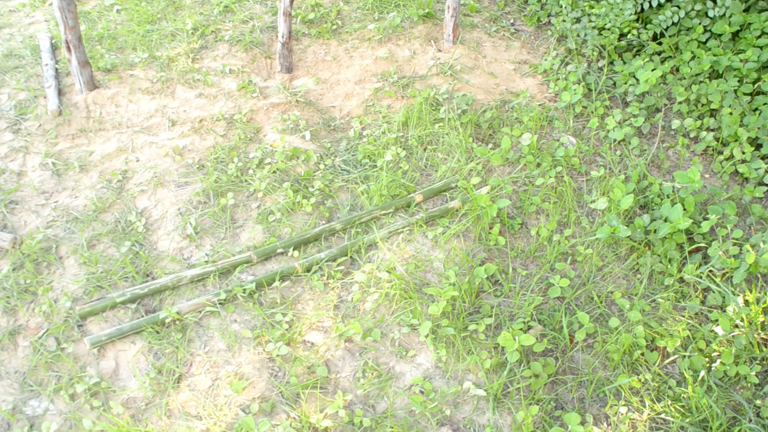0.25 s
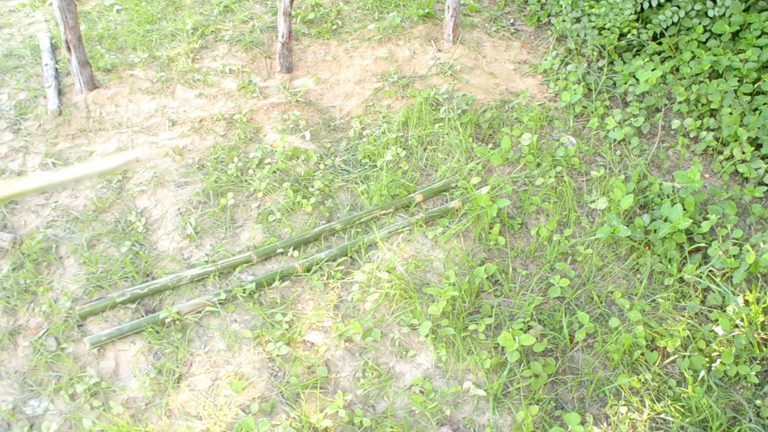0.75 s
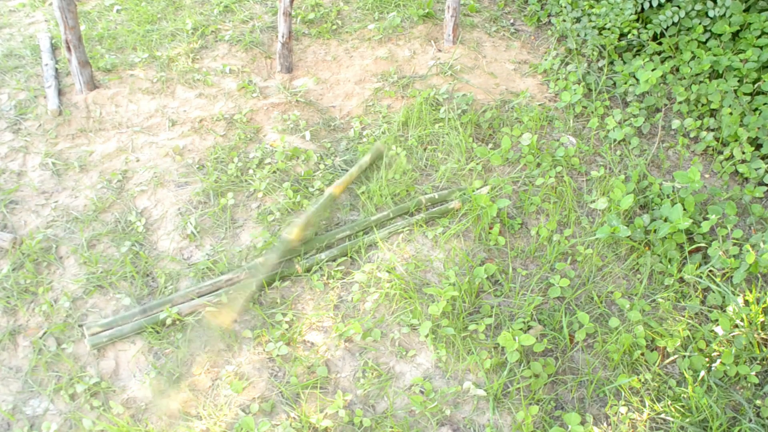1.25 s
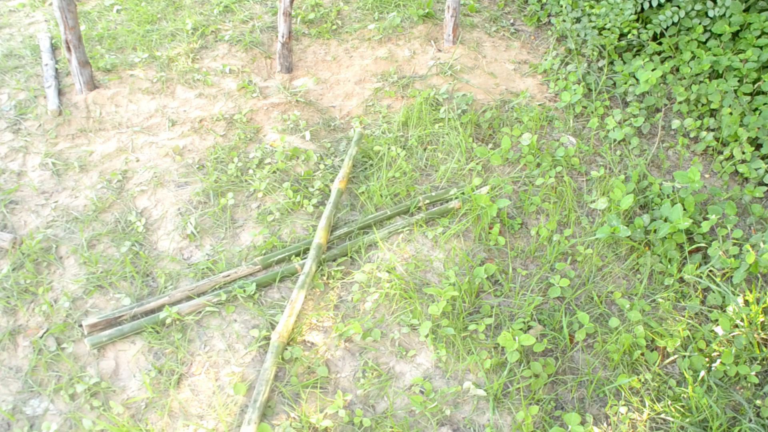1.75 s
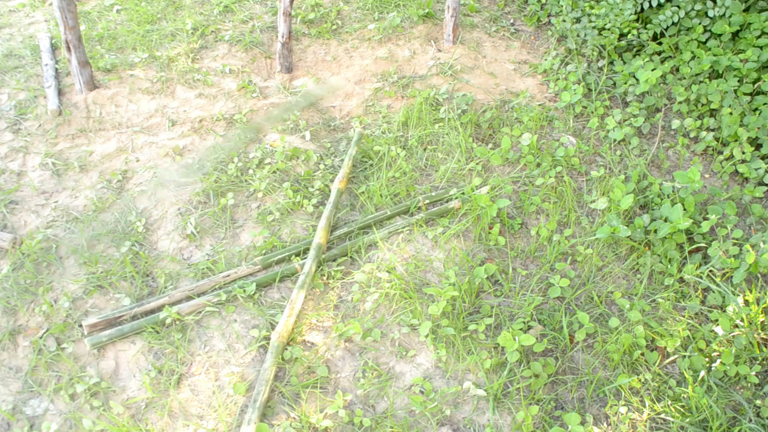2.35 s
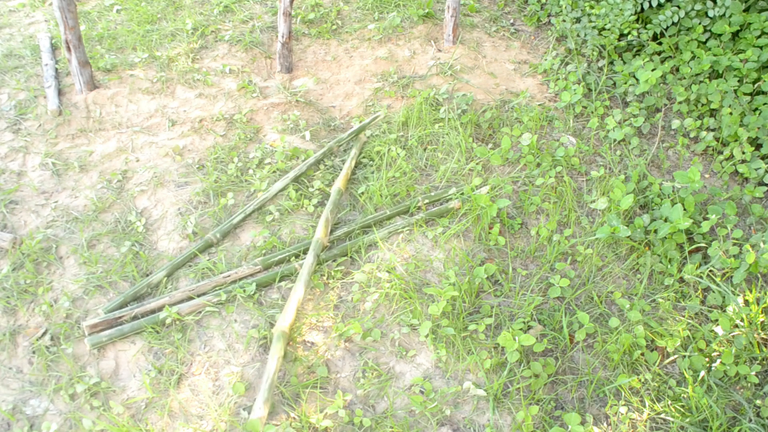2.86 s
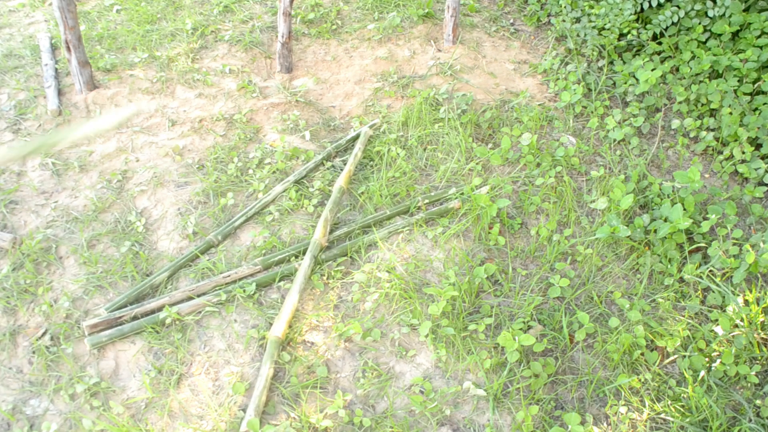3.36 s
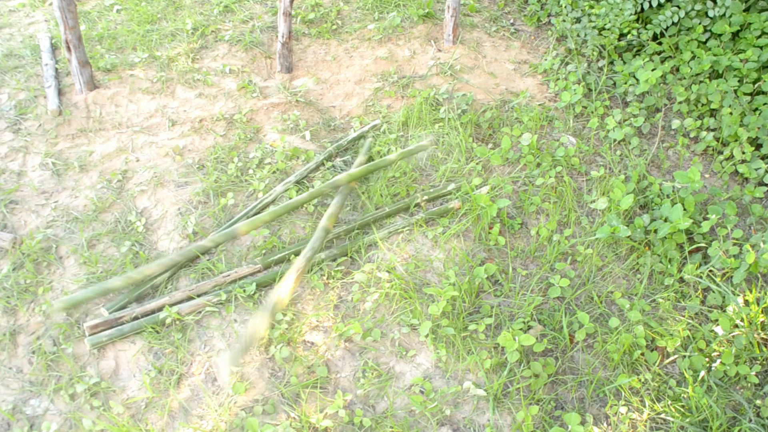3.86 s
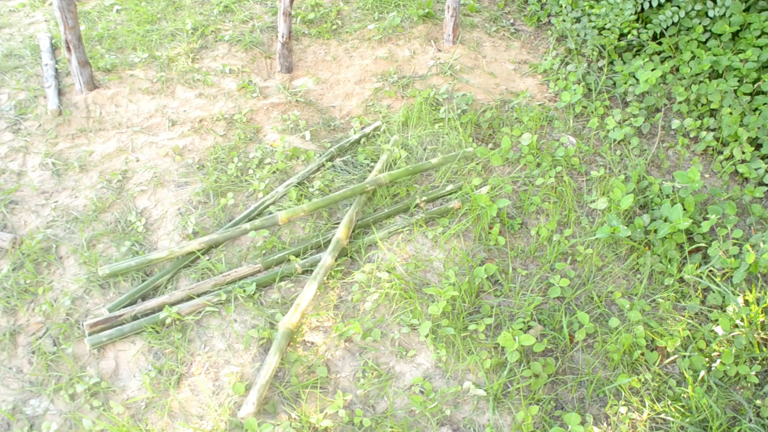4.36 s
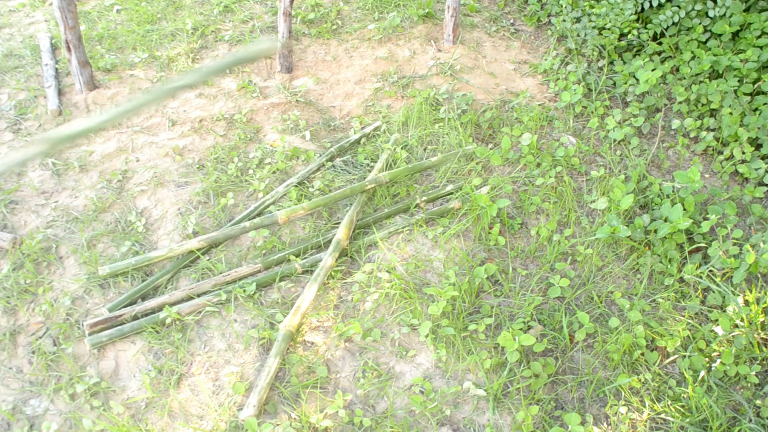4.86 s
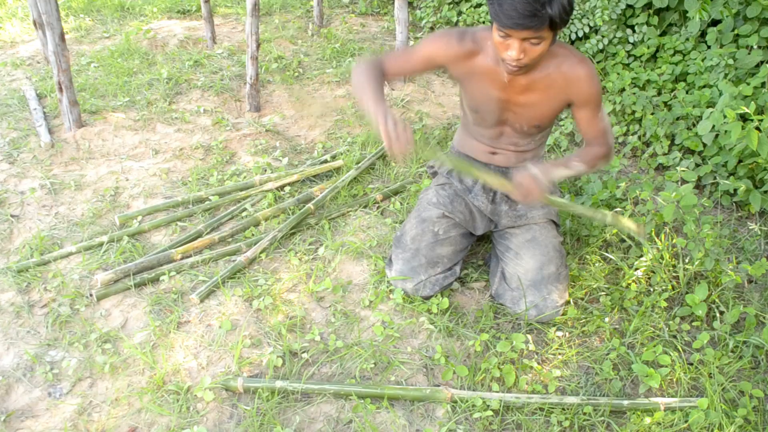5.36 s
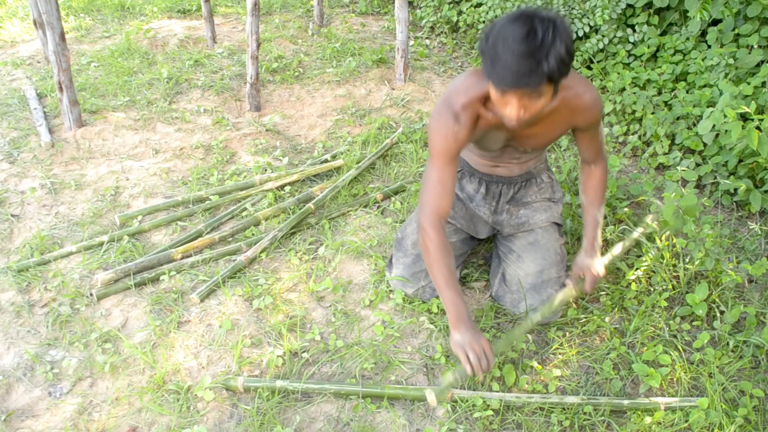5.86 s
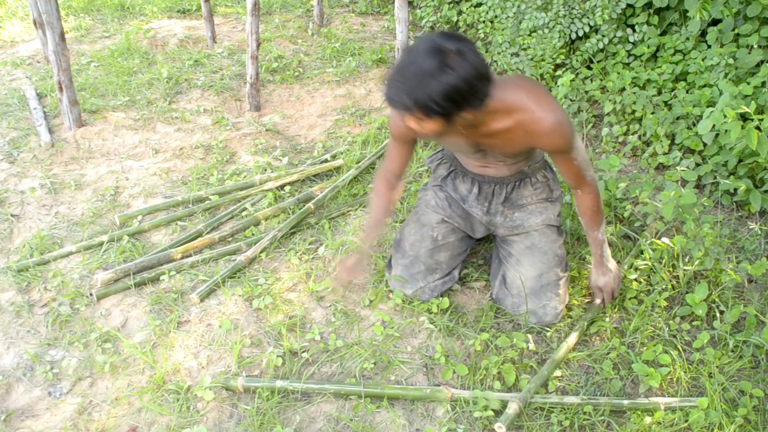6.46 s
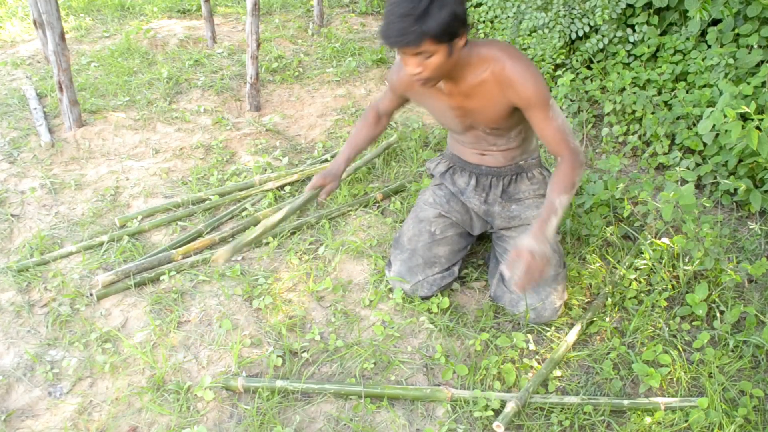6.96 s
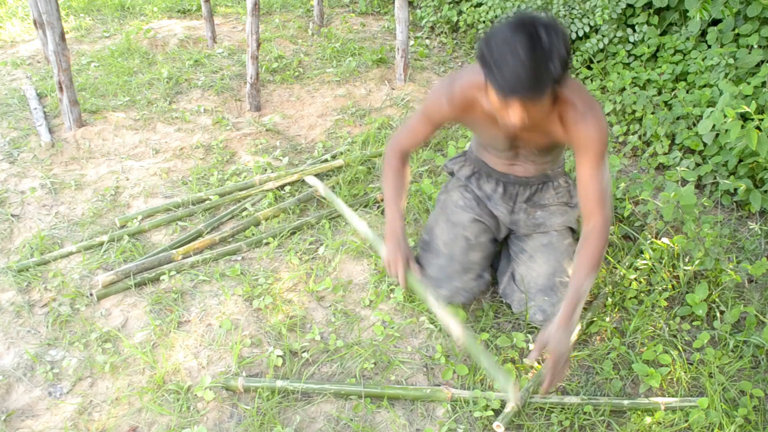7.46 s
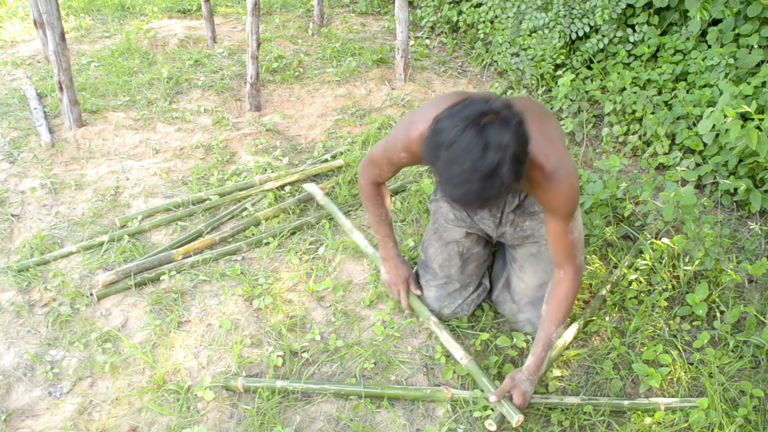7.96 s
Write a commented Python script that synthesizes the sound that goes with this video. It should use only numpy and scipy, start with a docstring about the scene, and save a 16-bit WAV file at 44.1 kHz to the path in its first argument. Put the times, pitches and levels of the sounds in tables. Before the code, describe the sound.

A dry, close outdoor scene with very quiet air. At 0 s there is a faint leftover tap and light grass rustle. At 1.0 s a first bamboo pole lands with hollow clacks and a soil thud, bouncing again at 1.25 s. A second, harder crack comes at 2.47 s, with a run of knocks until about 2.85 s. The third hits sharply at 3.79 s and rattles down, weakening until 4.3 s; tiny stalk snaps follow near 4.4 s. The fourth lands at 5.09 s, brightest and loudest at 5.13 s, slightly overloaded, and its clatter stops abruptly at 5.3 s. Then it is much quieter: faint grass scuffs, dry snaps near 5.8 s, a short damped knock at 6.03 s as a pole is laid by hand, and a cluster of soft taps at 7.6 s, with smaller ones to 8.1 s. Very faint distant chirps appear now and then.

```python
"""A grassy spot in the open: four green bamboo poles are tossed, one after another, onto a small pile.
Tube modes ring under noise bursts for wall, skin and soil; the hardest cracks overload the microphone.
Then two poles are laid down by hand across a third. Grass rustles as gated friction noise, dry stalks
snap as short clicks, faint chirps are noise-smeared tones, and filtered noise makes the open air."""
import sys
import numpy as np
from scipy import signal
from scipy.fft import rfft, irfft, next_fast_len
from scipy.io import wavfile
from scipy.ndimage import uniform_filter1d

SR = 44100
rng = np.random.default_rng(int(sys.argv[2]) if len(sys.argv) > 2 else 0)


def digitize_waveform(pressure):
    """Quantize a signal to 16-bit integers and store it at the path in sys.argv[1].

    Rows of a 2-D input are taken as channels; values are limited to [-1, 1].
    """
    field = np.atleast_2d(pressure).T
    bounded = np.clip(field, -1, 1)
    quanta = np.round(bounded * 32767).astype(np.int16)
    wavfile.write(sys.argv[1], SR, quanta)


N = 361619  # length in samples
RING_TIME = np.arange(SR // 2) / SR  # time axis of every knock and click [s]

# still outdoor air: (frequency [Hz], relative density [dB per Hz])
AIR_SPECTRUM = [(15, -39), (25, -17.5), (87, -1), (229, -2), (263, -1), (363, 0), (416, -2.5), (476, -1),
                (1040, -4.5), (2220, -10.5), (4140, -15.5), (4610, -18.5), (5280, -18.5), (9840, -34.5),
                (16000, -73.5)]
AIR_DB = -59

# hiss of the grass blades: (frequency [Hz], relative density [dB per Hz])
BLADE_SPECTRUM = [(1000, -23.5), (3000, -0.5), (5000, 1.5), (9500, 0.5), (11500, -17.5), (16000, -12.5)]
# scuff of the dry litter: (frequency [Hz], relative density [dB per Hz])
LITTER_SPECTRUM = [(200, -24), (700, -4.5), (1500, 4), (3000, 0), (5000, -7), (9000, -26.5)]
# stretches of grassy hiss and scuff that switch on and off:
# (time [s], length [s], hiss level [dB], scuff over hiss [dB])
GRASS_STRETCHES = [(0, 0.53, -67.5, 3.5), (0.229, 0.16, -57.5, -8), (0.735, 0.04, -56, -16),
                   (1.302, 0.34, -69.5, 12), (1.74, 0.14, -59, -19), (1.97, 0.44, -71, -4),
                   (2.423, 0.02, -45.5, 1), (2.555, 0.426, -64.5, 3.5), (3.1, 0.54, -67, -0.5),
                   (4.46, 0.089, -62.5, -0.5), (4.74, 0.035, -59.5, 1), (5.336, 0.17, -57, -18),
                   (5.505, .13, -62, -8), (5.7, .62, -69.5, 6), (6.671, 0.13, -64, 0),
                   (6.801, 0.18, -74.5, 13.5), (7.35, 0.072, -77.5, 15), (7.919, 0.044, -67.5, 19.5),
                   (7.977, 0.21, -64.5, 8)]
# each tossed pole first meets the grass: (time [s], extra stir of blades and litter [dB])
GRASS_LANDINGS = [(1.02, -1.5), (2.417, -1.5), (3.76, 4), (5.086, 1.5)]
FLIGHT_S = 0.233  # the grass is still while a pole is in the air
# steady stir of the grass under the worker
STIR_HISS_DB, STIR_SCUFF_DB = -73, -66
# stirred blades spring back slowly, the litter settles fast: base level, seconds to fall 60 dB
BLADES_DB, BLADES_T60 = -55.5, 2.8
LITTER_DB, LITTER_T60 = -43, 1.2

# pole knocks, the last three columns relative to the strength: (time [s], strength [dB],
# ring centre [Hz], ring of the poles it lands on [dB], clack of the wall [dB], crack of the skin [dB])
POLE_CONTACTS = [(.001, -29, 1450, -10.5, -3, -14), (.019, -38, 1250, -28, -2, -26),
                 (1.02, -18.5, 2400, -2.5, 3.5, -9), (1.024, -18, 715, -13, 0, 0),
                 (1.0358, -12, 2250, -7, -8, 4.5), (1.228, -45.5, 1500, 0, 9.5, 2),
                 (1.237, -37, 1480, 6, -10, -5), (1.2528, -11.5, 2300, -16, -12, -16.5),
                 (1.263, -17, 1450, -34.5, -6.5, -12), (1.35, -41, 1950, -9, -2, -4.5),
                 (1.54, -42.5, 810, -2, 11.5, -17), (2.443, -23, 1700, 1, -2, -2.5),
                 (2.47, -4, 1600, -1.5, -0.5, 0), (2.5309, -12.5, 930, -3, -8.5, -6),
                 (2.643, -28.5, 1500, 13, -1, -8), (2.675, -11.5, 1250, -9.5, -5.5, -7.5),
                 (2.6816, -16.5, 1690, -6, 4, -6.5), (2.755, -22, 2150, 4, -10, -8),
                 (2.7625, -10, 1750, -19, -8.5, -8.5), (2.798, -36, 2250, -6, 3, -20),
                 (2.8409, -14.5, 1340, -17.5, -6.5, -38), (3.002, -45, 1110, 0, -35.5, -0.5),
                 (3.7605, -44.5, 1000, 0, -4, 19), (3.765, -44.5, 2250, 4, 1, 16),
                 (3.7851, -3.5, 1940, -2, -1.5, 0), (3.828, -11, 730, -3, -8.5, -17),
                 (3.8865, -24.5, 1680, 7.5, 7, 5.5), (3.894, -16.5, 1270, -3.5, -24, 1),
                 (3.919, -30, 2600, -8, 9, -11.5), (3.929, -8.5, 740, -12, -9.5, -18),
                 (3.962, -26.5, 1980, 5.5, -1, -16), (4.0565, -13, 1222, -9.5, -0.5, -4),
                 (4.115, -25, 1940, -9, -5, -7.5), (4.1523, -26, 1400, -6.5, 1.5, -14),
                 (4.2, -37, 1680, 1.5, 0.5, -8), (4.252, -34.5, 1680, -1.5, 0.5, -5),
                 (4.291, -34.5, 1250, -5.5, -1.5, -24), (5.087, -33, 690, 17.5, -6, 5),
                 (5.0907, -3.5, 2660, -30.5, -7.5, 1), (5.1245, -13.5, 1450, 2.5, 7, 4),
                 (5.1283, 0, 2630, -33, -6, -6.5), (5.206, -29.5, 1070, 5.5, 9, -3),
                 (5.223, -23.5, 1450, -2, 1.5, -5), (5.2293, -12.5, 2600, -30, -8.5, -9),
                 (5.24, -26, 1230, 8, 6, 1), (5.281, -18, 1730, -1.5, -6, -10),
                 (5.29, -19, 1655, -12, 0.5, -8.5), (5.299, -26, 1440, 5.5, 1, -12),
                 (6.03, -14, 710, -42.5, -13, -22), (6.033, -9, 1615, -10, -22, -31),
                 (6.077, -27.5, 2300, -23, -9.5, -29), (6.834, -42, 814, -9, -15, -26.5),
                 (7.5742, -15, 1940, -35, -5, -12.5), (7.587, -30, 2600, -7.5, 7, 2.5),
                 (7.594, -15, 2220, -0.5, -19, -17), (7.601, -17, 930, -26, -7.5, -18),
                 (7.618, -22, 1000, -19, -8.5, -30), (7.8581, -23, 1850, -21, -2, -19.5),
                 (7.872, -30.5, 1230, -6, -9, -29), (7.9756, -30.5, 1600, -11, -1.5, -22.5),
                 (8.083, -25.5, 1080, -23, -7, -13)]
# poles that are landed on, ring times before damping: (frequency [Hz], level [dB], t60 [s])
LANDED_ON_MODES = [(268.5, -19, 1), (512, -18, .3), (515, -14.5, 0.4), (762, -4, .24), (812, -6, 0.29),
                   (1073, -4.5, .21), (1348, -10, .18), (1436, -2, 0.088)]
# first tossed pole, which also sounds the opening knocks: (frequency [Hz], level [dB], t60 [s])
FIRST_TOSSED_MODES = [(536.4, -0.5, 0.16), (726, -8, 0.16), (1041, -4, 0.11), (1210, -28, .08),
                      (1357, 5.5, 0.034), (1660, -19, 0.056), (1715, -3.5, 0.088), (1780, -20, 0.12),
                      (1936, -1, 0.056), (2402, -4.5, 0.072), (2700, -25.5, 0.032), (2870, -24, 0.081)]
# second tossed pole: (frequency [Hz], level [dB], t60 [s])
SECOND_TOSSED_MODES = [(1069, 0, 0.079), (1234, -22.5, 0.18), (1433, -4, 0.19), (1720, -2.5, 0.091),
                       (1874, -0.5, 0.017), (2005, -4.5, 0.085), (2287, -9.5, 0.09), (2770, -26.5, 0.084),
                       (3670, -13.5, 0.033), (4450, -1, 0.097), (5297, -23, 0.08)]
# third tossed pole: (frequency [Hz], level [dB], t60 [s])
THIRD_TOSSED_MODES = [(1023, -7.5, .14), (1379.6, -0.5, 0.075), (1500, -15.5, 0.13), (1631, -10, .08),
                      (1630, -9.5, 0.088), (1877, -8, .1), (2014, -1.5, 0.063), (2278, -8, 0.044),
                      (2910, -6, 0.05), (3081, -5.5, .05), (4430, -11, 0.049), (4960, -9, .05)]
# fourth tossed pole: (frequency [Hz], level [dB], t60 [s])
FOURTH_TOSSED_MODES = [(806, 1.5, 0.27), (991, 2, 0.082), (1220, -11, 0.15), (1323, 1, 0.1),
                       (1352, -14, 0.031), (1697, -11, 0.17), (1830, -11.5, 0.06), (2175, -9.5, 0.088),
                       (2283, -10.5, 0.076), (2970, -26, 0.1), (3300, -37, 0.054)]
# first pole laid by hand: (frequency [Hz], level [dB], t60 [s])
FIRST_LAID_MODES = [(754, -1, .115), (820, -16, .12), (1030, -13, .05), (1305, -6, .06), (1368, -4, .095),
                    (1659, -6, .09), (2022, -13, .075), (2235, -21, .06), (2680, -23, .07), (2960, -25, .1)]
# second pole laid by hand: (frequency [Hz], level [dB], t60 [s])
SECOND_LAID_MODES = [(431, -9, 0.16), (733, -7.5, 0.13), (806, -16.5, 0.2), (1020, -15.5, 0.1),
                     (1275, -0.5, 0.041), (1360, -10.5, 0.11), (1621, -7.5, 0.078), (2104, -3.5, 0.051),
                     (3200, -27, 0.053), (3585, -7.5, 0.05)]
# the next pole takes over: (time [s])
POLE_CHANGES = [2.3, 3.6, 5.0, 5.9, 6.5]
BREAK_OFF_S = 5.308  # the clatter and the settling of the grass break off abruptly
# share of ring time kept by the poles landed on; further share when a pole is laid by hand
LANDED_ON_SUSTAIN, HELD_SUSTAIN = .85, .35
CUSHION_S = 0.00072  # grass cushions each knock: time constant of the ring's build-up
# a springy pole touches again at once, more weakly; the delay varies around this one
RETOUCH_S, RETOUCH_DB = .004, -11
# clack of the tube wall: (frequency [Hz], relative density [dB per Hz])
CLACK_SPECTRUM = [(200, -39), (600, -8), (1100, 6), (1500, 4.5), (2200, -0.5), (3000, -6), (5000, -23),
                  (10000, -50.5), (16000, -69)]
# crack of the hard skin: (frequency [Hz], relative density [dB per Hz])
CRACK_SPECTRUM = [(100, -42), (500, -16), (2000, 7.5), (3200, 3.5), (5300, 1.5), (7000, -7), (8000, -14.5),
                  (10500, -14.5), (13000, -46.5), (16000, -17.5)]

# dry stalks snapping: (time [s], level [dB], centre [Hz])
STALK_SNAPS = [(.485, -46, 2530), (2.12, -42.5, 2500), (3.327, -50.5, 7860), (4.217, -41, 6200),
               (4.41, -40.5, 5530), (4.415, -39.5, 2000), (5.771, -36.5, 3460), (5.829, -42, 4043),
               (6.927, -46, 5500)]

# an end of a pole digs into the soil: (time [s], level [dB])
SOIL_THUDS = [(1.024, -13.5), (1.041, -17.5), (1.254, -25), (2.47, -25), (2.5315, -22.5), (3.002, -38.5),
              (3.236, -45), (3.785, -10), (3.894, -29), (4.0566, -19.5), (4.115, -32), (4.1525, -28),
              (4.2, -32), (4.251, -35), (4.291, -37), (5.1287, -15), (5.206, -27), (5.24, -31),
              (7.594, -25), (7.618, -33), (7.754, -40), (8.086, -36)]
# dull push of the soil: (frequency [Hz], relative density [dB per Hz])
THUD_SPECTRUM = [(30, -39.5), (150, -8.5), (280, 3), (550, 3.5), (800, 5), (1500, -26.5), (5000, -56.5)]

# faint chirps from far trees: (time [s], length [s], frequency [Hz], level [dB])
FAR_CHIRPS = [(3.527, 0.16, 3640, -69.5), (3.642, 0.075, 2620, -65.5), (4.932, 0.08, 2500, -64),
              (5.343, 0.14, 4630, -63.5), (5.837, 0.1, 4670, -70), (6.37, 0.18, 4620, -74),
              (6.956, 0.047, 4700, -67), (7.422, .14, 4620, -75)]

EDGE_HZ = 16300  # upper band limit


def amp(db):
    """Decibels to gain."""
    return 10 ** (np.asarray(db) / 20)


def unit(x):
    """Scales to rms 1."""
    return x / np.sqrt(np.mean(x ** 2) + 1e-20)


def add(mix, s, sound):
    """Mixes a sound in at s seconds."""
    part = mix[max(round(s * SR), 0):][:len(sound)]
    part += sound[:len(part)]


def colour(x, spectrum):
    """Causal filter through (Hz, dB) points on a log-frequency axis; white noise keeps its power."""
    hz, db = np.transpose(spectrum)
    size = next_fast_len(len(x))
    bins = abs(np.fft.fftfreq(size, 1 / SR))
    gain = unit(amp(np.interp(np.log(bins + 1), np.log(hz), db)))
    response = np.exp(np.conj(signal.hilbert(np.log(gain))))  # minimum phase
    return irfft(rfft(x, size) * response[:size // 2 + 1], size)[:len(x)]


def air(swell_db=0.2):
    """Quiet open-air background: coloured noise whose level swells a little through slow sines."""
    t = np.arange(N) / SR
    sines = [np.sin(2 * np.pi * (hz * t + rng.random())) for hz in np.geomspace(1, 8, 10)]
    swell = unit(sum(sines))
    noise = unit(colour(rng.standard_normal(N), AIR_SPECTRUM))
    return amp(AIR_DB + swell_db * swell) * noise


def friction(spectrum, grains_per_s, spread_db, grain_share):
    """Stalks slide past each other: a soft hiss with tiny ticks in it."""
    hits = rng.random(N) < grains_per_s / SR
    ticks = hits * amp(spread_db * np.minimum(rng.exponential(1, N), 4))
    grains = unit(ticks * rng.choice([-1, 1], N))
    return unit(colour(rng.standard_normal(N) + grain_share * grains, spectrum))


def grass(blur_s=.025):
    """Hiss and scuff switch on and off; landings stir blades and litter; all is still while a pole flies."""
    t = np.arange(N) / SR
    power = amp([[STIR_HISS_DB], [STIR_SCUFF_DB]]) ** 2 * np.ones(N)  # rows: blades, litter
    for s, length, db, scuff_db in GRASS_STRETCHES:
        power[:, (t >= s) & (t < s + length)] += amp([[db], [db + scuff_db]]) ** 2
    for s, db in GRASS_LANDINGS:
        settling = (t >= s) & (t < BREAK_OFF_S)
        t60 = np.array([[BLADES_T60], [LITTER_T60]])
        fall = np.exp(-np.log(1000) * (t[settling] - s) / t60)
        power[:, settling] += (amp([[db + BLADES_DB], [db + LITTER_DB]]) * fall) ** 2
        power[:, (t > s - FLIGHT_S) & (t < s + blur_s / 2)] = 0
    # soften the edges of every stir
    hiss, scuff = uniform_filter1d(np.sqrt(power), max(round(blur_s * SR), 1), axis=1)
    blades = friction(BLADE_SPECTRUM, grains_per_s=750, spread_db=4.5, grain_share=0.28)
    litter = friction(LITTER_SPECTRUM, grains_per_s=740, spread_db=3.5, grain_share=0.33)
    return hiss * blades + scuff * litter


def fade(t60):
    """Exponential decay, 60 dB down after t60 seconds."""
    return np.exp(-np.log(1000) * RING_TIME / np.maximum(t60, 1e-3))


def burst(spectrum, t60, tail_db, tail_t60, strike_db=-12):
    """Modes too dense to tell apart: the first push, a quick decay, then a faint scatter from the bushes."""
    envelope = fade(t60) + amp(tail_db) * fade(tail_t60)
    push = rng.standard_normal(len(RING_TIME)) * envelope
    push[0] += amp(strike_db) * np.linalg.norm(push)
    return colour(push / np.hypot(1, amp(strike_db)), spectrum)


def ring(modes, centre_hz, focus_db, uneven_db, sustain=1, detune=0.015):
    """Tube modes; contact hardness favours one region, the spot struck sets each mode's sign and size."""
    hz, db, t60 = np.transpose(modes)[:, :, None]
    side, spot, support = rng.standard_normal((3, len(hz), 1))
    focus = focus_db * np.log2(hz / centre_hz) ** 2
    size = np.sign(side) * amp(db - focus + uneven_db * spot)
    hz = hz * (1 + detune * support)  # the poles rest differently at every bounce
    return (size * fade(t60 * sustain) * np.sin(2 * np.pi * hz * RING_TIME)).sum(0)


def touch(clack_db, crack_db):
    """The tube wall clacks and the hard skin cracks, each a burst of dense modes."""
    clack = burst(CLACK_SPECTRUM, t60=0.056, tail_db=-31.5, tail_t60=.24, strike_db=-7)
    crack = burst(CRACK_SPECTRUM, t60=0.014, tail_db=-22.0, tail_t60=.18, strike_db=-10)
    return amp(clack_db) * clack + amp(crack_db) * crack


def bamboo(free_sustain=1.0):
    """Each contact clacks, cracks, and rings its pole and those it lands on, damped for hand-laid ones."""
    poles = [FIRST_TOSSED_MODES, SECOND_TOSSED_MODES, THIRD_TOSSED_MODES, FOURTH_TOSSED_MODES,
             FIRST_LAID_MODES, SECOND_LAID_MODES]
    tossed, laid = np.zeros(N), np.zeros(N)
    springs = rng.uniform(.5, 1.3, len(POLE_CONTACTS))  # spread of the retouch delay
    for (s, db, centre_hz, landed_db, clack_db, crack_db), spring in zip(POLE_CONTACTS, springs):
        track, sustain = (tossed, free_sustain) if s < BREAK_OFF_S else (laid, HELD_SUSTAIN)
        landed_on = ring(LANDED_ON_MODES, centre_hz, focus_db=5.0, uneven_db=3.5,
                         sustain=sustain * LANDED_ON_SUSTAIN, detune=.006)
        modes = poles[np.searchsorted(POLE_CHANGES, s)]
        pole = ring(modes, centre_hz, focus_db=12.0, uneven_db=0.53, detune=0.0046)
        build_up = 1 - np.exp(-RING_TIME / CUSHION_S)
        tone = (amp(landed_db) * landed_on + pole) * build_up
        add(track, s, amp(db) * (tone + touch(clack_db, crack_db)))
        add(track, s + RETOUCH_S * spring, amp(db + RETOUCH_DB) * touch(clack_db, crack_db))
    return tossed * (np.arange(N) < BREAK_OFF_S * SR) + laid


def radiate(x, corner_hz=220):
    """A slim tube sends out little bass, so a highpass thins the low end."""
    return signal.sosfilt(signal.butter(2, corner_hz, "highpass", fs=SR, output="sos"), x)


def stalks(skirt_db=-22):
    """A dry stalk gives a short, broad click around its centre frequency."""
    out = np.zeros(N)
    for s, db, hz in STALK_SNAPS:
        shape = [(hz / 8, skirt_db), (hz, 0), (hz * 4, skirt_db)]
        add(out, s, amp(db) * burst(shape, t60=0.015, tail_db=-39, tail_t60=.1))
    return out


def soil():
    """Soft ground answers a pole's end with a short, dull push."""
    out = np.zeros(N)
    for s, db in SOIL_THUDS:
        add(out, s, amp(db) * burst(THUD_SPECTRUM, t60=0.01, tail_db=-25, tail_t60=0.39, strike_db=-10.5))
    return out


def far_chirps(width_hz=90):
    """Distant birds: thin tones multiplied by slow noise, as if smeared by the foliage."""
    out = np.zeros(N)
    lowpass = signal.butter(2, width_hz, fs=SR, output="sos")
    smear = signal.sosfilt(lowpass, rng.standard_normal((len(FAR_CHIRPS), SR)))
    for (s, length, hz, db), flutter in zip(FAR_CHIRPS, smear):
        t = np.arange(round(length * SR)) / SR
        note = flutter[:len(t)] * np.sin(2 * np.pi * hz * t)
        add(out, s, amp(db) * unit(note * signal.windows.tukey(len(t), .5)))
    return out


def scene():
    """Everything at one microphone; poles and soil share the thinned bass."""
    knocks = radiate(bamboo() + soil())
    return (knocks + stalks() + grass() + far_chirps() + air())[None]


def record(dry, drive_db=1, lopsided=0.0089):
    """The hardest landings clip, a little lopsidedly, which adds a low bump; then the band limit."""
    clipped = np.clip(dry * amp(drive_db), -1, 1)
    highpass = signal.butter(1, 30, "highpass", fs=SR, output="sos")
    bump = signal.sosfilt(highpass, clipped ** 4)  # the even power is what makes it lopsided
    lowpass = signal.firwin(255, EDGE_HZ, window=("kaiser", 8), fs=SR)
    return signal.oaconvolve(clipped - lopsided * bump, lowpass[None], "same")


dry = scene()
out = record(dry)
digitize_waveform(out)
```